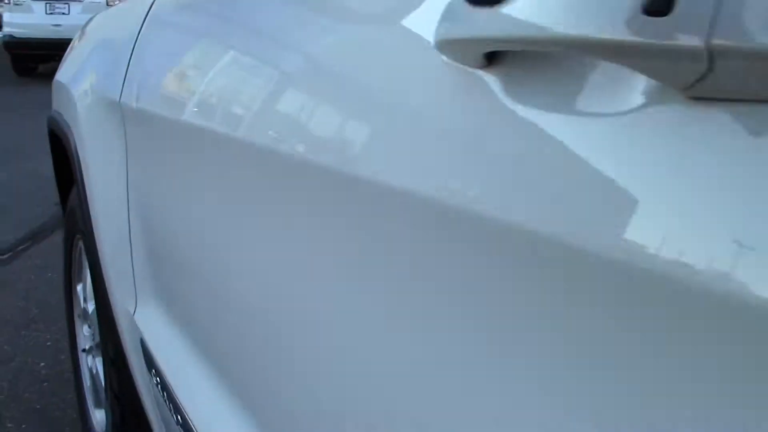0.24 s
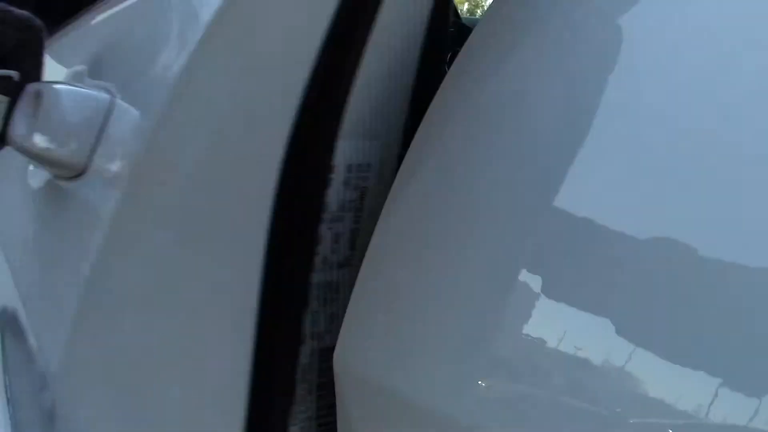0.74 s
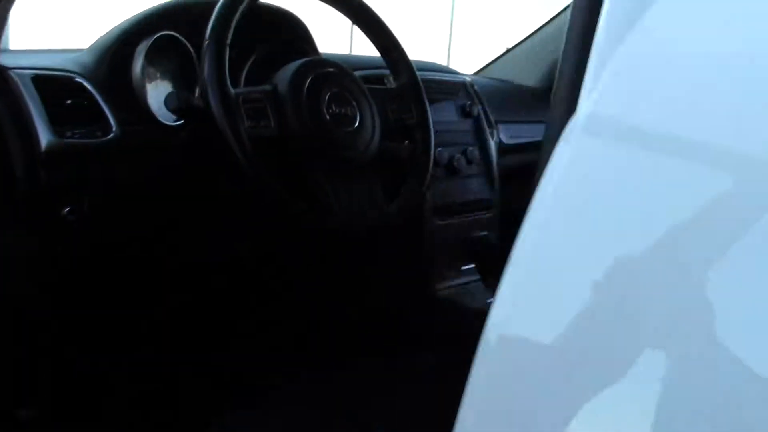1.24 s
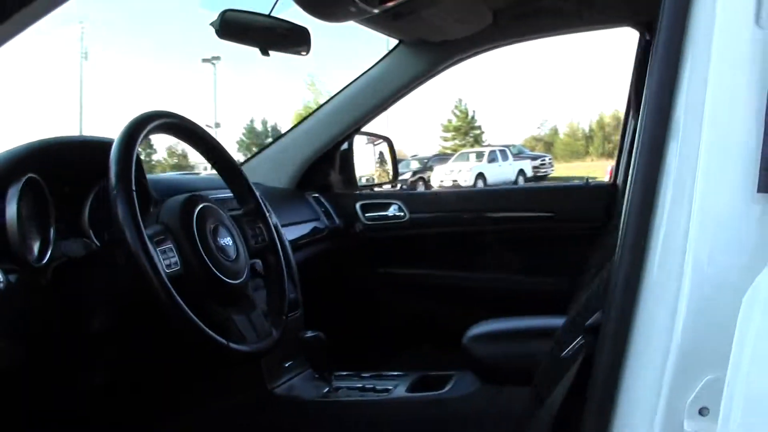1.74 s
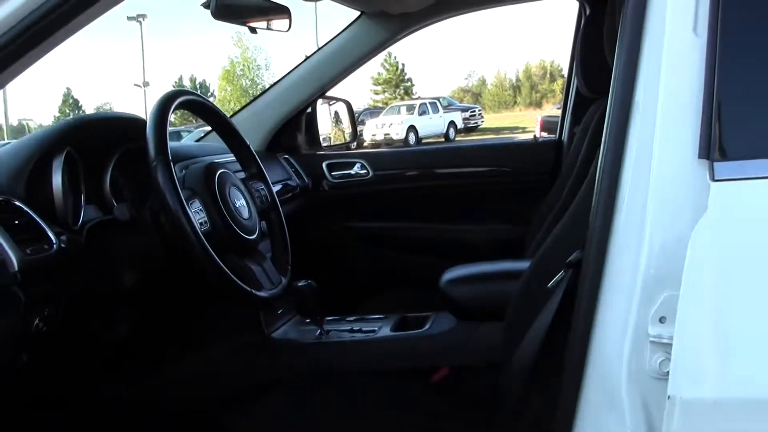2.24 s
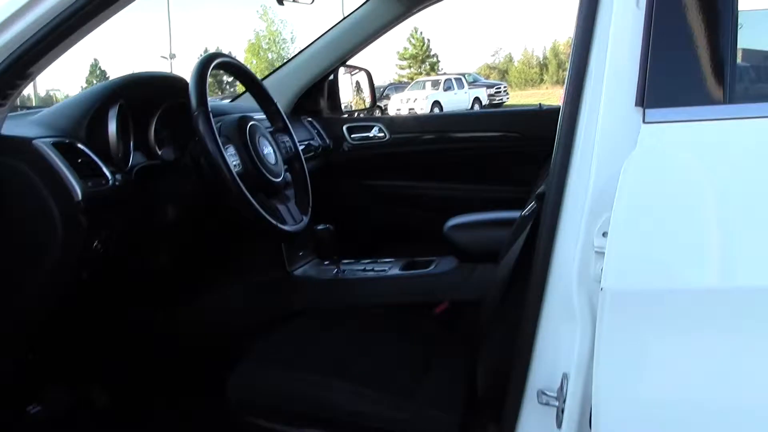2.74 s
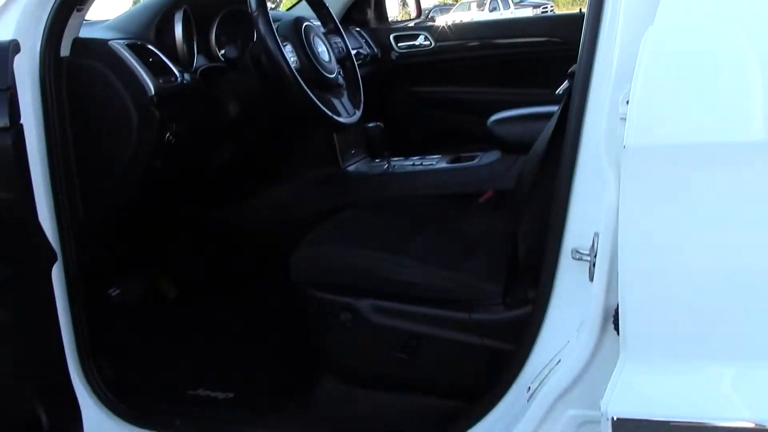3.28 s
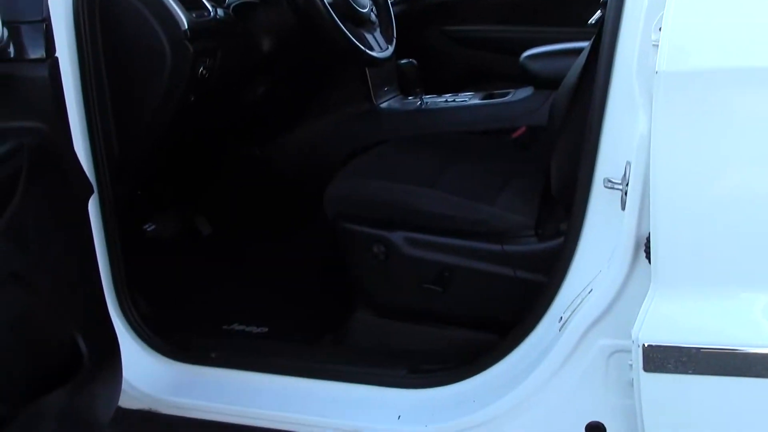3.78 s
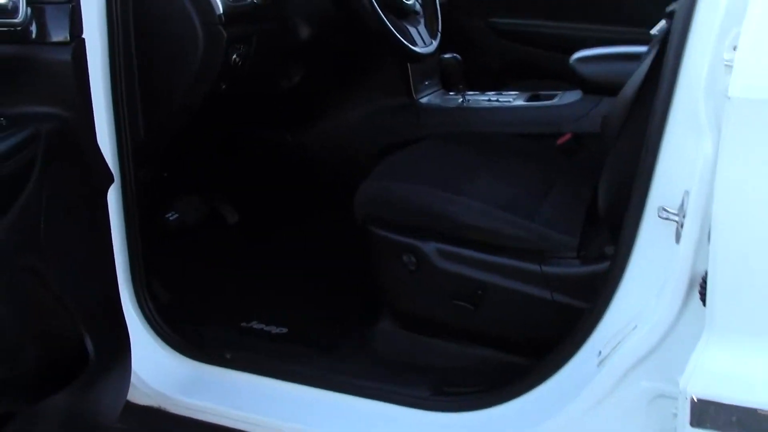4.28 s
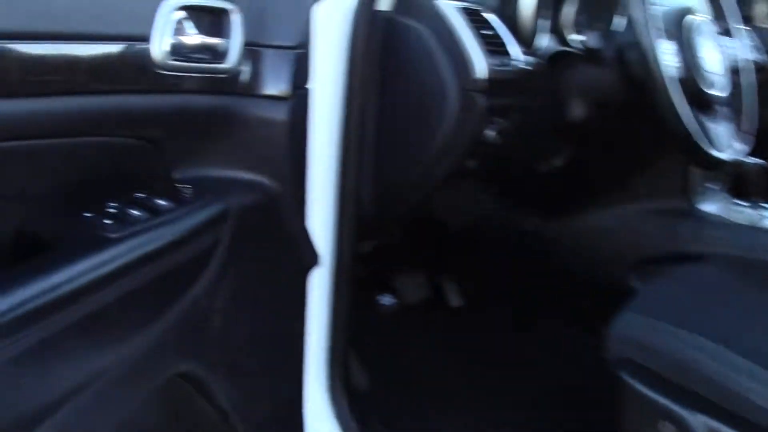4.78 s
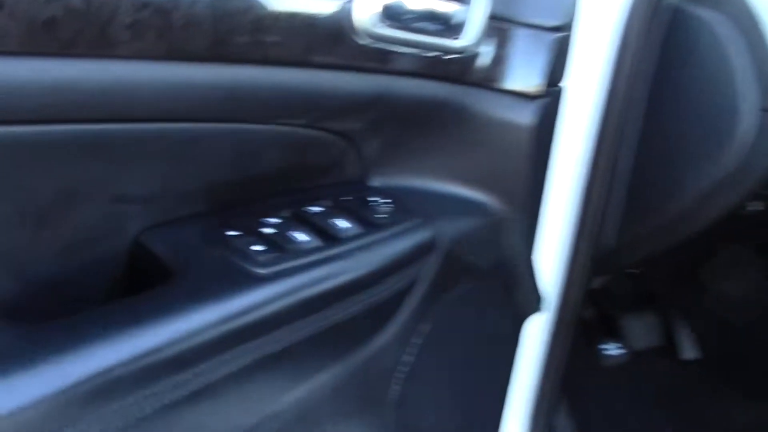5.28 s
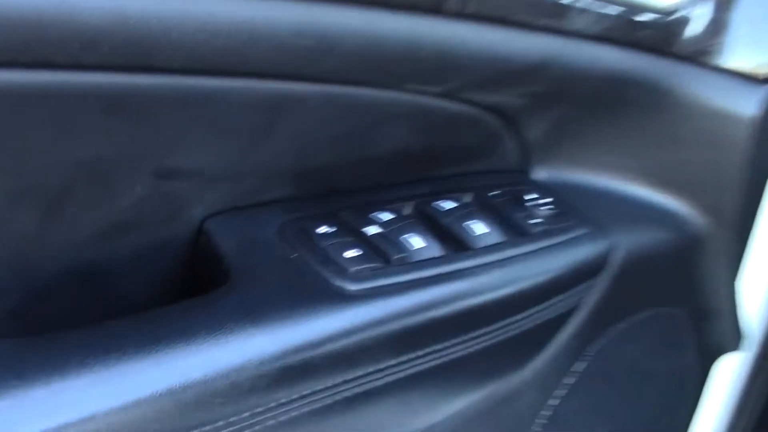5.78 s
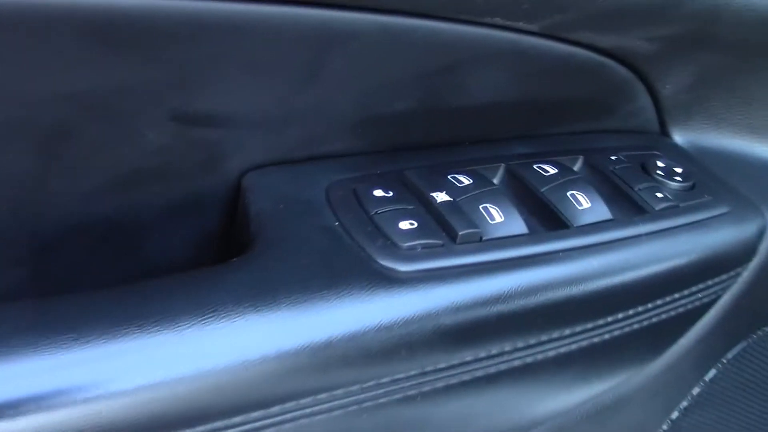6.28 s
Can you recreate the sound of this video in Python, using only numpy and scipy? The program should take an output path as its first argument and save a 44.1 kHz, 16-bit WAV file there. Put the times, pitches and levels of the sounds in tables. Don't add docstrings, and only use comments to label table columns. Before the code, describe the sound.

Wind pushes low and uneven against a close, effectively mono microphone outdoors, with distant tyre roar and a faint engine hum behind. Soft brushing leads into a rapid latch clatter, then a hard, hollow handle strike with short rebounds. A few dry clicks follow. Gusts then take over, swelling into thick, slightly overloaded thumps late on, before calmer air leaves traffic and faint amplifier hiss.

```python
import sys
import numpy as np
from scipy import signal
from scipy.fft import rfft, irfft, next_fast_len
from scipy.io import wavfile
from scipy.ndimage import uniform_filter1d, map_coordinates

SR = 44100
rng = np.random.default_rng(int(sys.argv[2]) if len(sys.argv) > 2 else 0)


def wav_record(signal):
    frames = np.transpose(np.atleast_2d(signal))
    bounded = np.clip(frames, -1, 1)
    quanta = np.round(bounded * 32767).astype(np.int16)
    wavfile.write(sys.argv[1], SR, quanta)


def rack_gain(trim_db):
    fader = np.asarray(trim_db, float)
    return 10 ** (fader / 20)


N = 287576
COARSE_S = np.arange(0, N + 64, 64) / SR


def unit(x):
    return x / np.sqrt(np.mean(x ** 2) + 1e-20)


def along(points, hz):
    point_hz, values = np.transpose(points)
    return np.interp(np.log(hz + 1), np.log(point_hz + 1), values)


def curves(rows):
    times_s, *columns = np.transpose(rows)
    return [np.interp(np.arange(N) / SR, times_s, column) for column in columns]


def fine(coarse):
    return np.interp(np.arange(N) / SR, COARSE_S, coarse)


def swell(start_s, length_s):
    return np.exp(-2 * ((COARSE_S - start_s) / (abs(length_s) + 0.0034)) ** 2)


def wobble(rate_hz):
    knots = rng.standard_normal(int(N * rate_hz / SR) + 4)
    return map_coordinates(knots, [np.arange(N) * rate_hz / SR])


def noise(spectrum, length=N):
    size = next_fast_len(length + 8192)
    hz = np.fft.rfftfreq(size, 1 / SR)
    white = rfft(rng.standard_normal(size))
    return unit(irfft(white * rack_gain(along(spectrum, hz)), size)[:length])


def add(track, start_s, sound):
    part = track[round(start_s * SR):][:len(sound)]
    part += sound[:len(part)]


def ringing(modes, stretch, t):
    total = 0
    for pitch_hz, level_db, t60_s in modes:
        strength, phase = rng.standard_normal(2)
        envelope = rack_gain(level_db + 2 * strength - 60 * t / (t60_s * stretch))
        total = total + envelope * np.sin(2 * np.pi * pitch_hz * t + phase)
    return total


def clatter(colour, stretch, length):
    # pitch_hz, t60_s
    band_decay = [(200, 0.58), (700, 0.1), (2000, 0.094), (5000, 0.063), (10000, 0.084)]
    hz, t, bands = signal.stft(noise(colour, length), SR, nperseg=128)
    fading = rack_gain(-60 * t / (stretch * along(band_decay, hz)[:, None]))
    return signal.istft(bands * fading, SR, nperseg=128)[1][:length]


def contacts(events, low_modes, high_modes, low_db, thud_db, high_db, clatter_db):
    # pitch_hz, level_db (per Hz)
    thud_colour = [(60, -20), (120, -7), (250, 1), (500, -10), (900, 4.5), (1500, -26), (4000, -70)]
    # pitch_hz, level_db (per Hz)
    crack_colour = [(150, -45), (400, -16), (900, 5.5), (2000, -5), (4000, -15), (9000, -31), (13000, -58)]
    track, t = np.zeros(N), np.arange(SR // 2) / SR
    knock_onset, crack_onset = 1 - np.exp(-t / 0.0014), 1 - np.exp(-t / 0.00034)
    for start_s, level_db, knock_db, stretch in events:
        stretch = np.clip(stretch, .1, 3)
        knock = rack_gain(low_db) * ringing(low_modes, stretch, t)
        knock += rack_gain(thud_db) * clatter(thud_colour, 1.02 * stretch, len(t))
        crack = rack_gain(high_db) * ringing(high_modes, stretch, t)
        crack += rack_gain(clatter_db) * clatter(crack_colour, stretch, len(t))
        impact = rack_gain(knock_db) * knock * knock_onset + crack * crack_onset
        add(track, start_s, rack_gain(level_db) * impact)
    return track


def latch_release():
    # start_s, crack_db, knock_db (re crack), decay_stretch (ratio)
    latch_events = [
        (.623, -29, -20, 1.16),
        (.6264, -28, 7.5, 0.46),
        (.6304, -31.5, 15.5, 0.47),
        (.644, -41, 7, 0.68),
        (.6634, -35, 7.5, 0.39),
        (.6664, -37, 3, 0.21),
        (.6794, -47, -1, 0.71),
        (.69, -51, 10.5, 0.66),
        (.7033, -37, 3, 0.32),
        (.7114, -47, 2, 0.6),
    ]
    # pitch_hz, level_db, t60_s
    door_modes = [(218, -26, 0.066), (287, -13, 0.068), (346, 1, 0.089), (423, 1, 0.087), (590, -5, 0.083),
                  (648, -3.5, 0.069), (818, 0.5, 0.053), (1060, -12, 0.066)]
    # pitch_hz, level_db, t60_s
    latch_steel = [(1310, -15, 0.047), (1887, 2.5, 0.062), (2017, 3, 0.051), (2930, -6, 0.044),
                   (3500, -32, .05), (4100, -10.5, 0.039)]
    return contacts(latch_events, door_modes, latch_steel, low_db=-0.5, thud_db=-10, high_db=-5.5, clatter_db=-5)


def handle_snap():
    # start_s, crack_db, knock_db (re crack), decay_stretch (ratio)
    handle_events = [
        (1.0634, -34, -20, 0.64),
        (1.069, -23, -15, 0.44),
        (1.0765, -17.5, -3.5, 0.97),
        (1.0844, -35, 0, 0.68),
        (1.0934, -32, 13, 0.6),
        (1.106, -40.5, 14, 1.2),
        (1.1354, -36.5, 19, 0.17),
        (1.184, -41, 14, 0.27),
        (1.2121, -50, 4, .5),
    ]
    # pitch_hz, level_db, t60_s
    skin_modes = [(115, -0.5, 0.45), (160, 2, 0.21), (255, -8, 0.084), (377.5, 4, 0.14), (491, 7.5, 0.079),
                  (620, -12, 0.074), (799, -1, 0.16), (1000, -17, .08)]
    # pitch_hz, level_db, t60_s
    skin_steel = [(1360, 8, 0.12), (1880, 11, 0.033), (2310, -13, .09), (2770, -17, .08),
                  (3700, -10, 0.053), (5260, -49, .05)]
    return contacts(handle_events, skin_modes, skin_steel, low_db=-11.5, thud_db=-14, high_db=-19, clatter_db=-5)


def ticks():
    # start_s, peak_db, pitch_hz, t60_s, crack_db (re peak)
    small_parts = [(.326, -62, 5000, .015, 3), (.531, -34.5, 744, 0.027, -11), (.567, -35, 620, 0.04, -20),
                   (.867, -46, 2800, 0.0089, 3), (1.268, -48.5, 2280, 0.023, -8),
                   (1.349, -48, 1400, .02, -9), (1.35, -56, 3300, .02, 2), (1.376, -37, 620, 0.022, -7),
                   (1.377, -48.5, 2380, 0.016, -1), (1.446, -36, 407, 0.024, -26),
                   (1.4835, -49, 5300, .004, -8), (1.532, -33, 4300, 0.0079, -8),
                   (1.5402, -42, 5470, 0.008, 6.5), (1.877, -44.5, 895, 0.035, -6),
                   (3.019, -34, 600, 0.0071, -22), (2.479, -56, 3400, .012, 0),
                   (.6665, -37, 2260, 0.009, -3), (.7045, -44, 2100, .015, 3),
                   (1.0947, -32, 1300, 0.012, -3), (1.0769, -38, 6000, .005, 1),
                   (4.788, -49, 5000, .005, -3)]
    crack_colour = [(600, -22), (1500, 20), (4000, 8), (7000, -8), (11000, -26)]  # (Hz, dB per Hz)
    track, t = np.zeros(N), np.arange(SR // 10) / SR
    onset = 1 - np.exp(-t / 0.00011)
    for start_s, peak_db, pitch_hz, t60_s, crack_db in small_parts:
        pair = np.sin(2 * np.pi * pitch_hz * t) + 0.42 * np.sin(2 * np.pi * 0.95 * pitch_hz * t)
        tone = pair * rack_gain(-60 * t / abs(t60_s))
        crack = noise(crack_colour, len(t)) * rack_gain(-60 * t / 0.0083)
        add(track, start_s, rack_gain(peak_db) * (0.87 * tone + rack_gain(crack_db - 2.5) * crack) * onset)
    return track


def rustles():
    # centre_s, level_db (rms), length_s, pitch_hz
    brushes = [(0.349, -48, 0.021, 825), (0.543, -55, 0.012, 900), (0.58, -37, 0.02, 430),
               (0.612, -39.5, 0.017, 450), (0.681, -53, 0.028, 700), (1.175, -47, 0.013, 1250),
               (1.565, -65, 0.023, 6500), (1.795, -49, 0.012, 900), (2.005, -55, 0.02, 1000),
               (0.775, -63, 0.019, 3500), (1.18, -64, 0.026, 3000), (1.22, -58, 0.018, 2500),
               (1.688, -61.5, 0.052, 4000), (1.792, -64, .03, 3000), (2.167, -59, 0.032, 1770),
               (2.37, -61.5, 0.038, 4000), (2.481, -55.5, 0.014, 3200), (2.633, -60, 0.019, 2500),
               (2.732, -61, 0.034, 2500), (.05, -62, .06, 3200)]
    track = np.zeros(N)
    for centre_s, level_db, length_s, hz in brushes:
        u = np.linspace(-2, 2, int(4 * abs(length_s) * SR) + 8)
        colour = [(hz / 12, -80), (hz / 4, -25), (hz / 2.66, 0), (hz * 1.06, -1), (hz * 3, -25), (hz * 8, -80)]
        brush = noise(colour, len(u))
        add(track, centre_s - 2 * abs(length_s), rack_gain(level_db) * np.exp(-2 * u ** 2) * brush)
    return track


def wind():
    # time_s, strength_db
    wind_strength = [(0, -47.5), (.62, -42.5), (1.0, -54), (1.35, -53), (1.58, -58.5), (1.83, -49),
                     (2.09, -50), (2.3, -56), (2.45, -34), (2.67, -45.5), (2.91, -39.5), (3.1, -42.5),
                     (3.65, -41.5), (4.0, -49), (4.36, -28), (4.8, -30.5), (5.12, -53.5), (6.52, -56.5)]
    # centre_s, push_db, length_s, bite_db (added to the wind)
    eddies = [(0, -34.5, 0.16, -7), (.25, -35, 0.085, -6.5), (0.477, -31, 0.18, -5.5), (.7, -42, 0.21, 0),
              (1.223, -40, 0.071, 2), (1.574, -41.5, 0.062, -2), (1.912, -34.5, 0.14, -1),
              (2.068, -28, 0.065, -4), (2.236, -31.5, 0.2, 7), (2.467, -33, 0.045, 1),
              (2.532, -29, 0.094, 3), (2.75, -31.5, 0.11, 1.5), (2.92, -28.5, 0.1, 1),
              (3.188, -31, 0.066, 0.5), (3.26, -30, 0.046, 4), (3.502, -34.5, 0.27, -6),
              (3.645, -36, 0.18, 5), (3.818, -30.5, 0.14, 0), (3.98, -27.5, 0.037, 3),
              (4.092, -30, 0.084, -2), (4.436, -18, .06, 2.5), (4.548, -25, 0.044, 1),
              (4.688, -43, 0.036, 6.5), (4.79, -20.5, 0.043, -5.5), (4.993, -30.5, 0.13, 5.5),
              (5.19, -32.5, 0.12, 2), (5.87, -40, 0.15, 5), (6.049, -40, 0.071, -6),
              (6.238, -40.5, 0.047, 4), (6.46, -39, 0.054, 3)]
    # pitch_hz, level_db (per Hz)
    buffet_colour = [(11, -32), (18, 6.5), (35, 4.5), (55, 2), (80, -4), (110, -12.5), (200, -27),
                     (440, -106)]
    # pitch_hz, level_db (per Hz)
    flutter_colour = [(40, -51), (75, -1.5), (115, -4), (170, -10.5), (250, -18.5), (400, -35.5),
                      (800, -80)]
    # pitch_hz, level_db (per Hz)
    rasp_colour = [(120, 2), (220, -3), (320, -3), (500, -12), (800, -38), (1600, -70)]
    bites_db = sum(bite_db * swell(s, length_s) for s, _, length_s, bite_db in eddies)
    strength_db = curves(wind_strength)[0] + fine(bites_db)
    over_calm_db = strength_db + 50
    eddy_power = fine(sum((rack_gain(push_db) * swell(s, length_s)) ** 2 for s, push_db, length_s, _ in eddies))
    push = np.sqrt(eddy_power + rack_gain(-45 + 0.86 * over_calm_db) ** 2)
    rasp_level = rack_gain(-61.5 + 0.94 * over_calm_db)
    lumps = wobble(35)
    buffet = unit(rack_gain(0.38 * wobble(12)) * noise(buffet_colour))
    flutter = unit(rack_gain(1.93 * lumps) * noise(flutter_colour))
    rasp = unit(rack_gain(3.1 * lumps + 2.0 * wobble(70)) * noise(rasp_colour))
    return push * buffet + rack_gain(strength_db) * flutter + rasp_level * rasp


def engine():
    # time_s, tone_db, overtones_db (re tone)
    drone_levels = [(0, -40, -33), (.9, -49, -2.5), (1.7, -43.5, -9.5), (2.2, -46, -8), (3.5, -44.5, -6.5),
                    (4, -55.5, 4.5), (5.2, -43, -13), (5.45, -48, -4.5), (5.65, -48.5, 4), (5.9, -55.5, 0),
                    (6.2, -57, 0.5), (6.52, -54, -0.5)]
    # multiple (of the firing rate), level_db
    harmonics = [(2, 1), (3, -8.5)]
    firing_hz, waver_db = 58.37, 2.5
    tone_db, over_db = curves(drone_levels)
    phase = 2 * np.pi * np.cumsum(firing_hz * (1 + 0.02865 * wobble(7))) / SR
    overtones = sum(rack_gain(db + waver_db * wobble(8)) * np.sin(k * phase) for k, db in harmonics)
    firing = rack_gain(waver_db * wobble(4.6)) * np.sin(phase)
    return rack_gain(tone_db) * (firing + rack_gain(over_db) * overtones)


def traffic():
    # pitch_hz, level_db (per Hz)
    tyre_colour = [(100, -12.5), (200, 1.5), (400, -0.5), (800, 0.5), (1300, -4), (2000, -13.5),
                   (3500, -23.5), (9000, -35.5)]
    # centre_s, rise_db (over the roar), length_s
    cars = [
        (0, 5, 0.3),
        (0.73, 4.5, 0.31),
        (1.247, 6, 0.33),
        (1.732, 4, 0.29),
        (2.64, 4.5, 0.51),
        (3.11, 1.5, 0.32),
        (3.796, 3, 0.19),
        (4.563, 3, 1),
        (5.633, 3, 0.27),
        (6.276, 2, 0.17),
    ]
    bands = signal.stft(noise(tyre_colour), nperseg=512)[2]
    patches = uniform_filter1d(rng.standard_normal(bands.shape), size=6, axis=0)
    patches = uniform_filter1d(patches, size=12, axis=1)
    roar = signal.istft(bands * rack_gain(1.22 * unit(patches)), nperseg=512)[1][:N]
    level_db = -59.5 + fine(sum(rise_db * swell(s, length_s) for s, rise_db, length_s in cars))
    shimmer_db = 1.1 * wobble(20)
    return rack_gain(level_db + 2.5 + shimmer_db) * unit(roar)


def amplifier_hiss():
    # pitch_hz, level_db (per Hz)
    hiss_colour = [(88, -20), (150, -7.5), (205, -4), (420, -5), (481, -5), (1290, -6), (9000, -12),
                   (15500, -16)]
    return rack_gain(-60.5) * np.array([noise(hiss_colour), noise(hiss_colour)])


def scene():
    door = latch_release() + handle_snap() + ticks() + rustles()
    background = wind() + engine() + traffic()
    return np.tile(door + background, (2, 1))


def roll_off(x):
    return signal.sosfilt(signal.butter(12, 15650, fs=SR, output="sos"), x)


def record(dry):
    ceiling, knee = .26, 4
    rounded = dry / (1 + np.abs(dry / ceiling) ** knee) ** (1 / knee)
    capsule = signal.butter(4, 9600, fs=SR, output="sos")
    mix = signal.sosfilt(capsule, rounded) + amplifier_hiss()
    return roll_off(mix)


dry = scene()
out = record(dry)
wav_record(out)
```